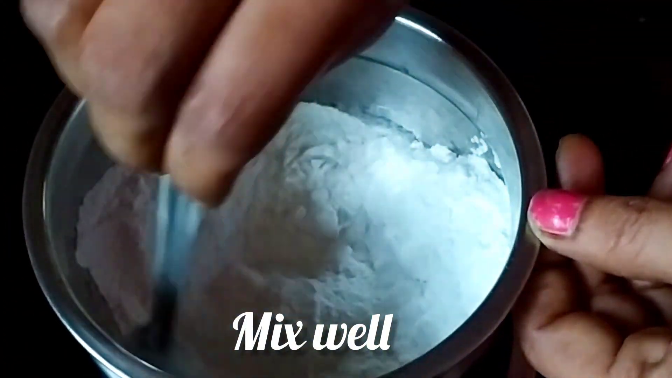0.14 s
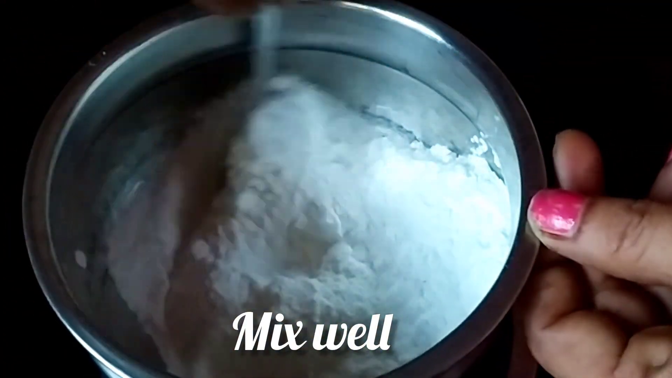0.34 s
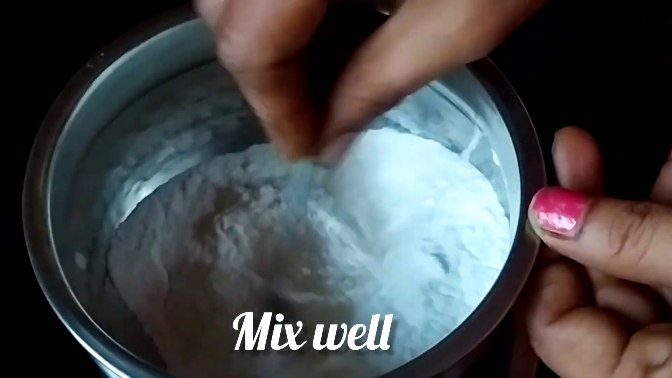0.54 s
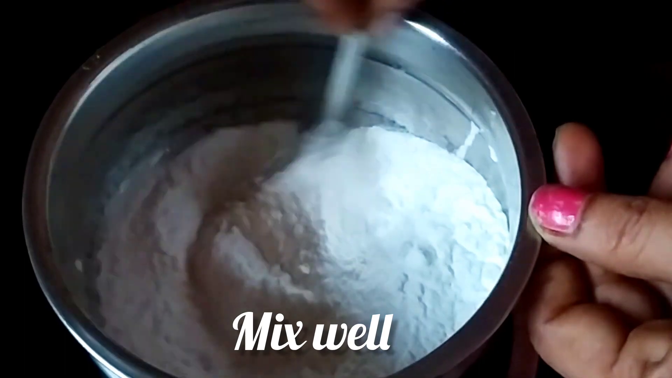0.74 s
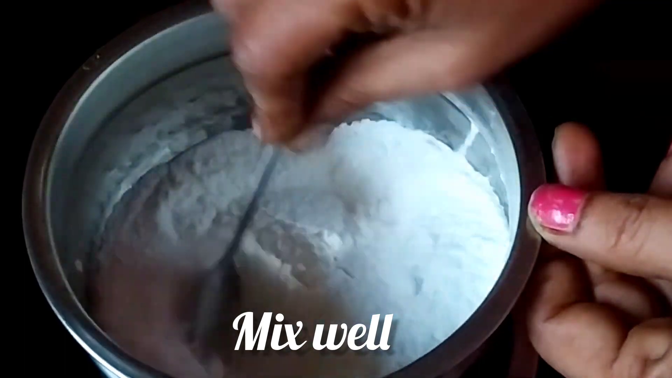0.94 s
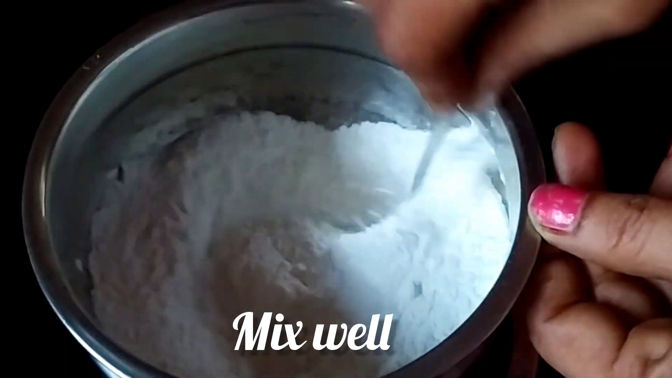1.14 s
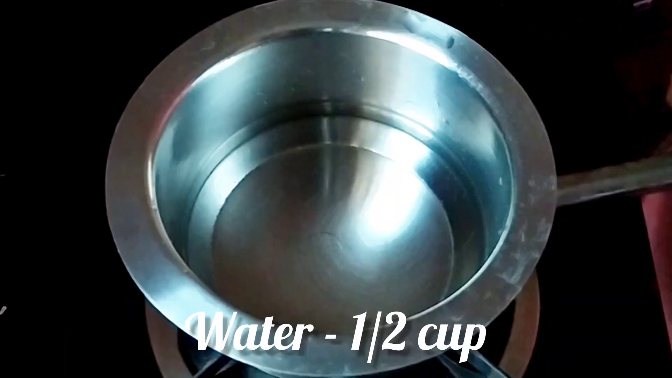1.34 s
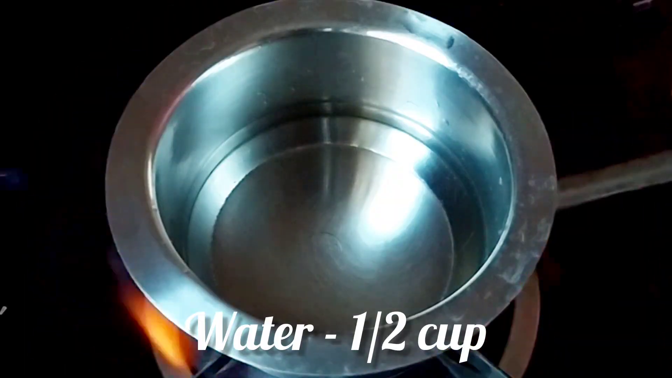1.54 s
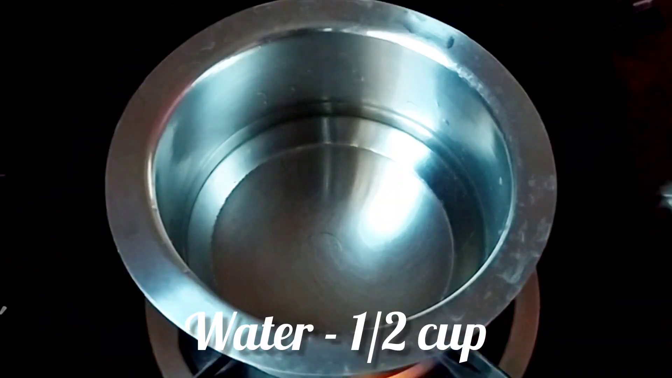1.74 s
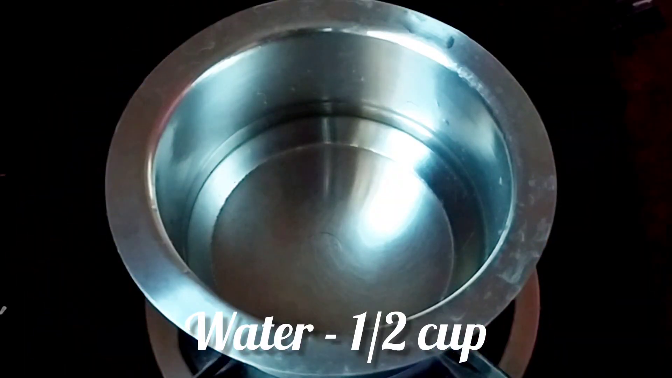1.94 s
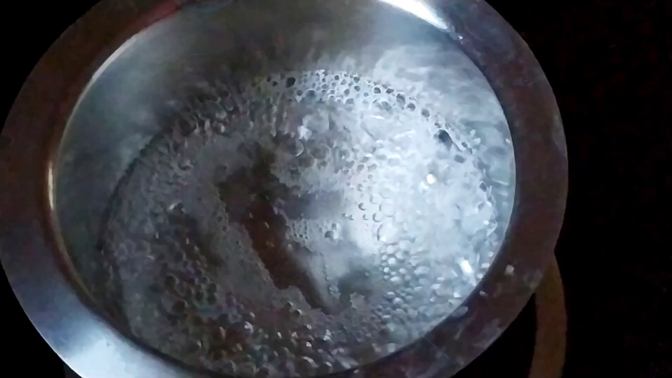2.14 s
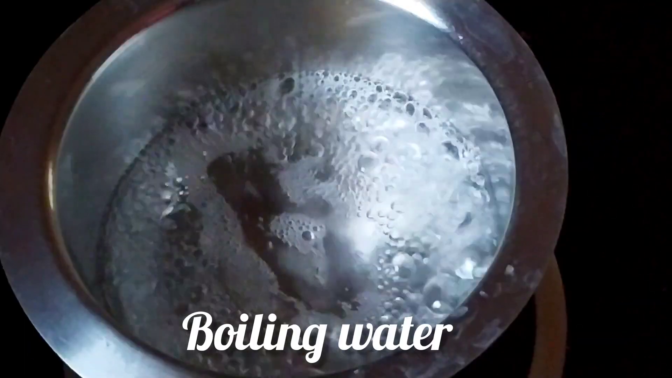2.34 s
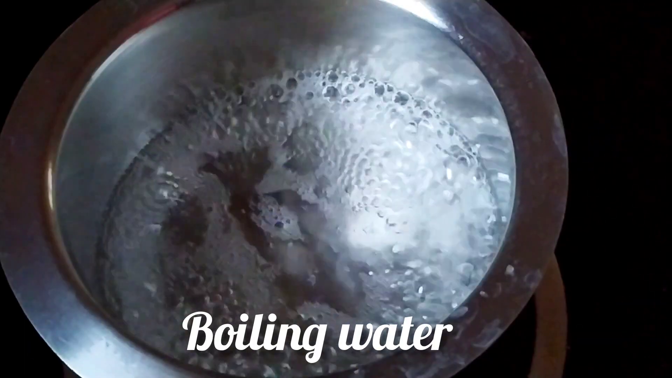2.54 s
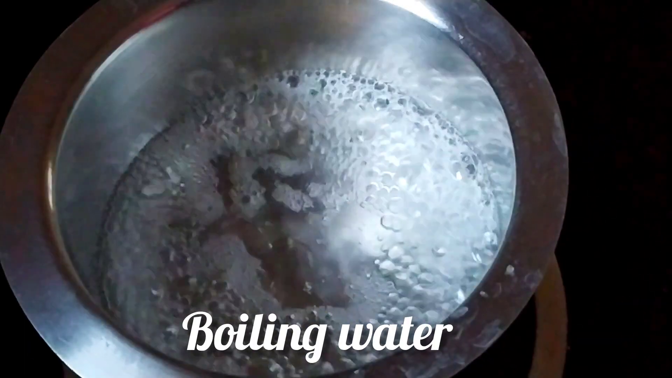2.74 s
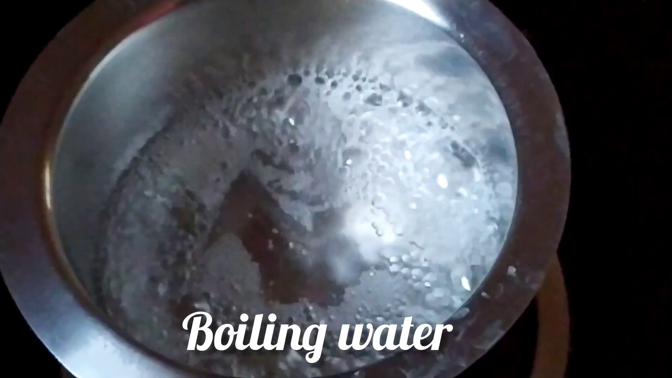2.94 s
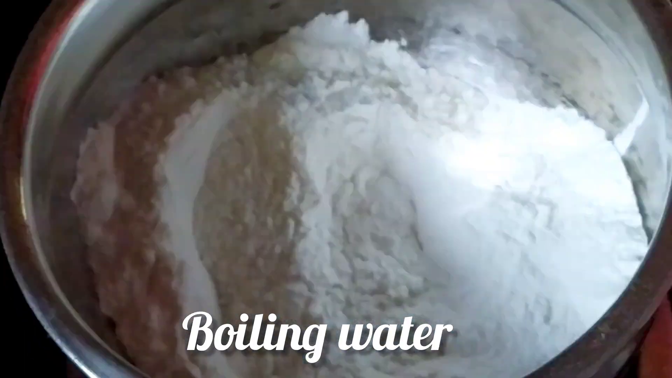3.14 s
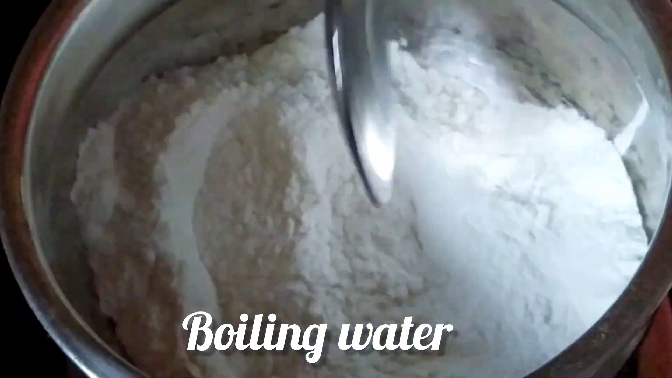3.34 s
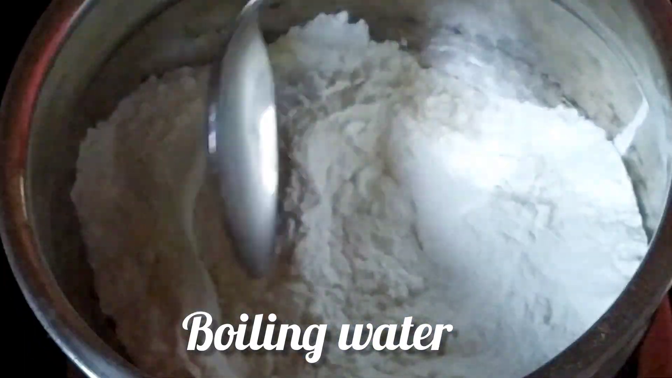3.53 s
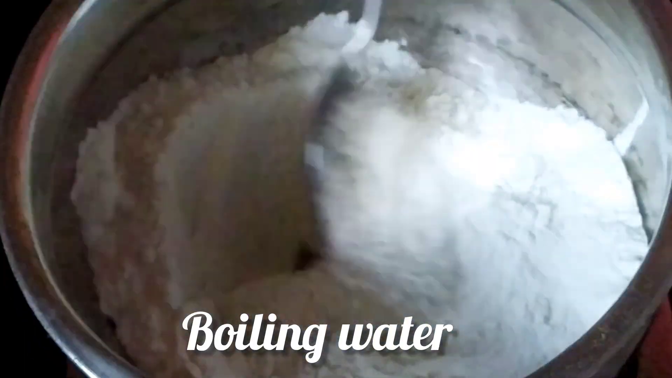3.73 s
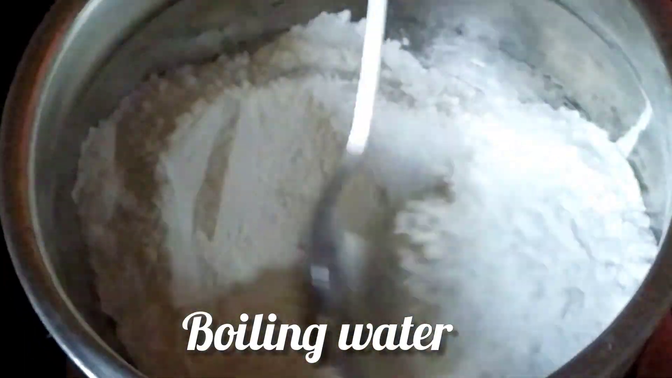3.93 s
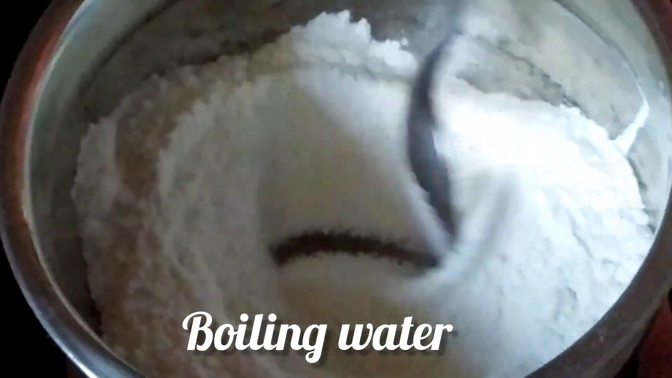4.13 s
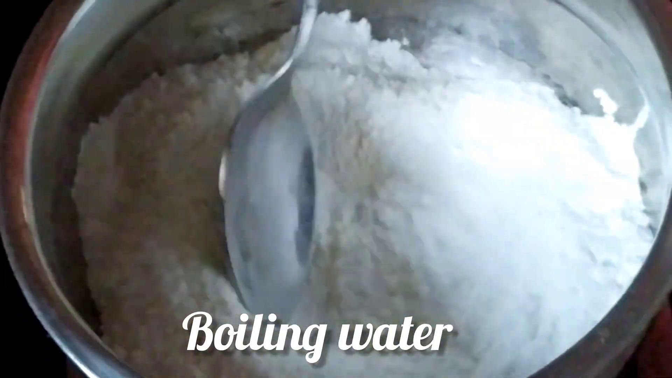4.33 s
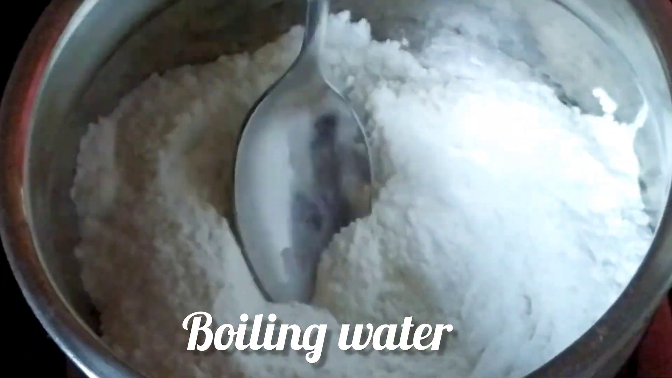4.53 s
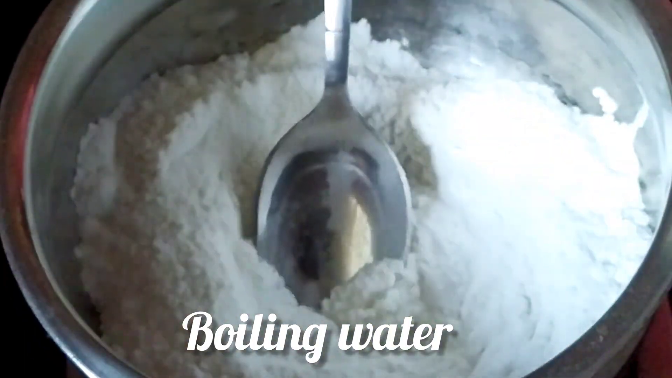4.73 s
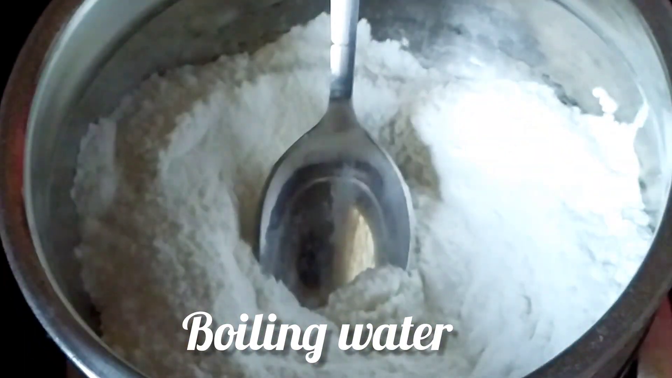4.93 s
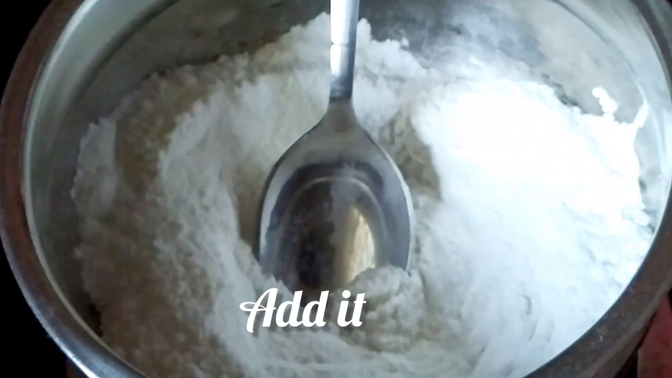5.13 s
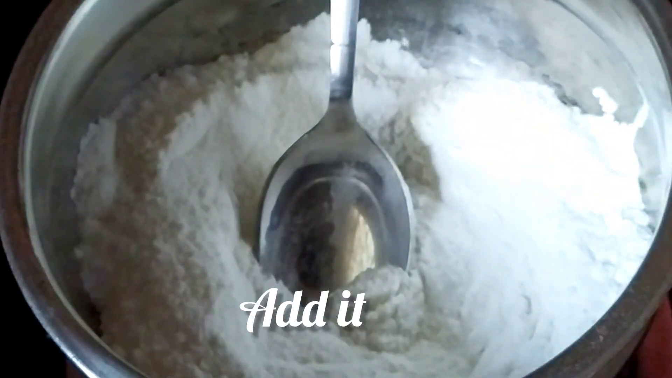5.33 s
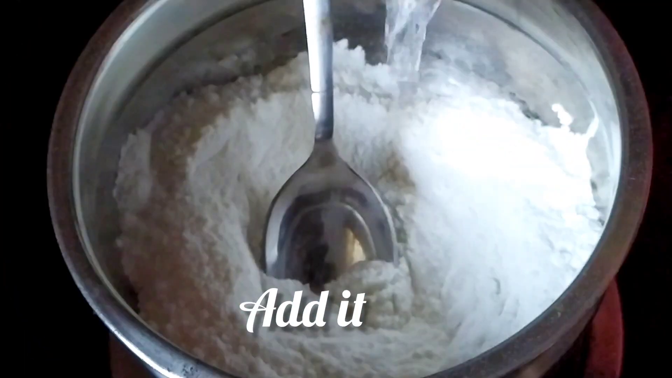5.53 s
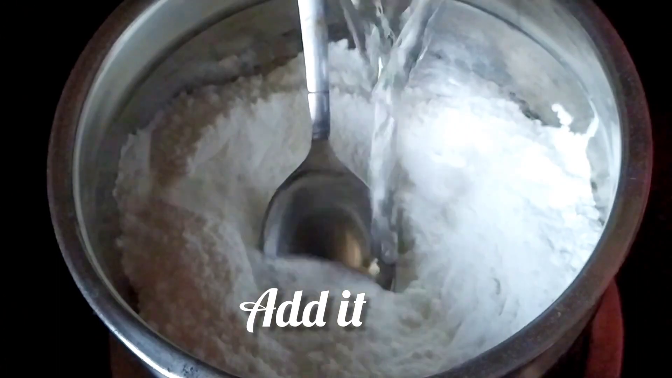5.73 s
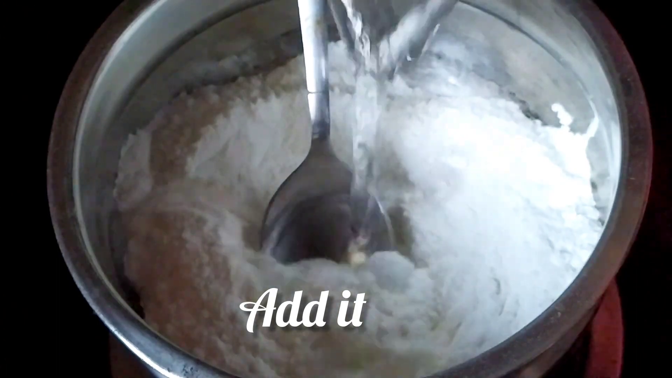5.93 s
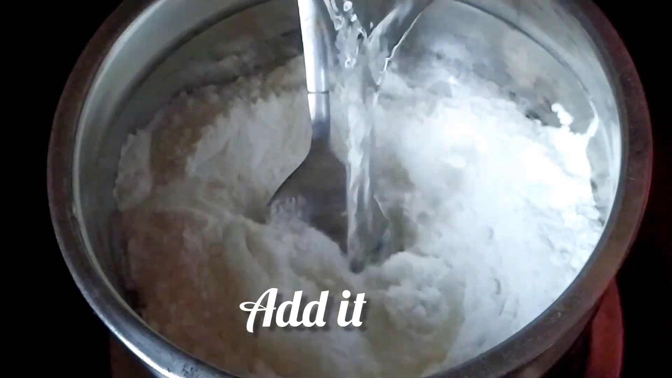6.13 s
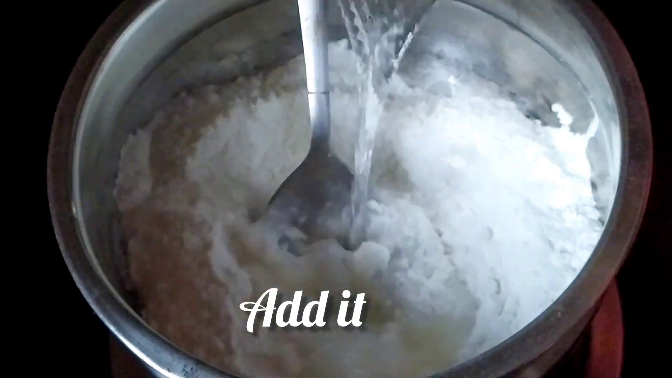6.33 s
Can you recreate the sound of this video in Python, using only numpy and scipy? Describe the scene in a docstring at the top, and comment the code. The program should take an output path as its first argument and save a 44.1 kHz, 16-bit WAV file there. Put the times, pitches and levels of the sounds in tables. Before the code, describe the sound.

Close kitchen sounds over a faint fan hum and hiss: first come short, gritty spoon strokes through flour in a steel bowl. The sharp snap of a spark lighter sets a gas burner fluttering, followed by more metallic clicks. The sound cuts out, a pot bubbles quietly for a moment, and it cuts out again. Dull spoon knocks lead to fading clinks against the bowl, and hot water pours in with a soft fizz.

```python
"""Stirring flour, boiling water.

A steel spoon grinds and knocks through flour in a steel bowl. A spark lighter snaps, a gas ring
catches and bubbles burst in a pot. The spoon digs again, clinks to rest on the bowl's wall, and hot
water fizzes in. A fan hum and a thin hiss run underneath; two near-silent gaps set off the boiling."""
import sys
import numpy as np
from scipy import signal
from scipy.fft import rfft, irfft
from scipy.io import wavfile
from scipy.ndimage import map_coordinates

SR = 44100
rng = np.random.default_rng(int(sys.argv[2]) if len(sys.argv) > 2 else 0)


def master_out(mix):
    """Clip the mix to full scale and print it as 16-bit PCM to the path in sys.argv[1]."""
    frames = np.transpose(np.atleast_2d(mix))
    ceiling = np.clip(frames, -1, 1)
    pcm = np.round(ceiling * 32767).astype(np.int16)
    wavfile.write(sys.argv[1], SR, pcm)


N = 280917
T = np.arange(N) / SR
AGE = T[:SR // 2]  # time since a blow, s

# audible spans (stirring and lighting, boiling, digging and pouring): start/s, end/s
SPANS = [(0, 2.199), (2.48, 3.041), (3.145, 6.4)]


def amp(db):
    """Decibels to gain."""
    return 10 ** (np.asarray(db) / 20)


def unit(x):
    """Scale to rms 1."""
    return x / np.sqrt(np.mean(x ** 2))


def pan(db):
    """Channel gains for a left-minus-right level."""
    return amp(np.array([[db], [-db]]) / 2)


def fade(t60_s):
    """Exponential decay of a blow."""
    return np.exp(-np.log(1000) * AGE / max(t60_s, .002))


def gate(start_s, end_s, edge_s=0.0022):
    """One between two times, with linear ramps."""
    return np.clip((T - start_s) / edge_s, 0, 1) * np.clip((end_s - T) / edge_s, 0, 1)


def add(out, s, x):
    """Mix a sound in at a time."""
    i = int(s * SR)
    out[:, i:i + x.shape[1]] += x[:, :N - i]


def walk(rate_hz):
    """Random drift with a spread near 1."""
    knots = rng.standard_normal(int(rate_hz * T[-1]) + 2)
    return np.interp(T * rate_hz, np.arange(len(knots)), knots)


def colour(x, spectrum, corner_hz=np.inf):
    """Shape by a spectrum and a low-pass; rms 1. Long waves reach both channels nearly alike."""
    f = np.fft.rfftfreq(x.shape[1], 1 / SR) + 1
    hz, db = np.transpose(sorted(spectrum))
    left, right = rfft(x)
    width = np.minimum(0.2 + (f / 850) ** 2, 1)
    mid, side = left + right, (left - right) * width
    gain = amp(np.interp(np.log(f), np.log(hz), db))
    gain /= np.sqrt((1 + (f / corner_hz) ** 4) * (1 + width ** 2))
    gain *= np.minimum(f / hz[0], 1) ** 2
    return unit(irfft(np.array([mid + side, mid - side]) * gain, x.shape[1]))


def noise(spectrum, size=N, corner_hz=np.inf):
    """Coloured stereo noise."""
    return colour(rng.standard_normal((2, size)), spectrum, corner_hz)


def grains(per_s, spread_db):
    """Random clicks of uneven size, slightly earlier on the right."""
    clicks = (rng.random(N) < per_s / SR) * rng.standard_normal(N)
    clicks *= amp(spread_db * np.minimum(rng.exponential(size=N), 4))
    return np.array([clicks, np.roll(clicks, -5)])


def wander(x, share, rate_hz):
    """Let all frequencies drift together."""
    position = np.cumsum(1 + share * walk(rate_hz))
    return np.array([map_coordinates(side, [position], mode="mirror") for side in x])


def reflect(x, wet_db, t60_s=1.0):
    """Direct sound plus dense reflections from vessel and tiled walls."""
    tail = rng.standard_normal((2, len(AGE))) * fade(t60_s)
    tail *= amp(wet_db) / np.sqrt(np.sum(tail ** 2) / 2)
    return (x + signal.fftconvolve(x, tail, axes=1)[:, :N]) / np.hypot(1, amp(wet_db))


def resonate(x, modes, width_hz):
    """Filter through modes broadened by touch, at unchanged level."""
    f = np.fft.rfftfreq(x.shape[1], 1 / SR)
    response = sum(amp(db) / np.square(1 + 2j * (f - hz) / width_hz) for hz, db in modes)
    return unit(irfft(rfft(x) * response, x.shape[1])) * np.std(x)


def ring(modes, t60_s, corner_hz=np.inf, uneven_db=3.5, loss_hz_s=np.inf):
    """Decaying modes, weighted anew by each contact; a soft one barely excites the high modes."""
    out = 0
    for hz, db in modes:
        phase = 2 * np.pi * rng.random() + min(hz / 2500, 1) * rng.standard_normal((2, 1))
        gain = amp(db + uneven_db * rng.standard_normal((2, 1))) / np.hypot(1, (hz / corner_hz) ** 4)
        beat = np.cos(2 * np.pi * (rng.random() * hz / 500) * AGE)  # close mode pairs
        out = out + gain * beat * np.sin(2 * np.pi * hz * AGE + phase) * fade(loss_hz_s / hz)
    return unit(out) * fade(t60_s) * (1 - fade(0.0038))


def blow(spectrum, contact_t60_s, tail_db, tail_t60_s, corner_hz=np.inf):
    """The crack of contact, then a wash of crowded modes and reflections."""
    decay = fade(contact_t60_s) + amp(tail_db) * fade(tail_t60_s)
    return noise(spectrum, len(AGE), corner_hz) * decay * (1 - fade(0.002))


def rattle(x, depth_db=2.8, rate_hz=300):
    """Loose steel makes and breaks contact, chopping a blow."""
    return x * unit(amp(depth_db * walk(rate_hz)))[:len(AGE)]


def fan(hum_hz=300.3):
    """A fan hums on one slightly wavering note."""
    phase = 2 * np.pi * np.cumsum(hum_hz + 0.67 * walk(14)) / SR
    return np.sin(phase) * amp(-62 + 0.99 * walk(8.2))


# room air and hiss spectra: f/Hz, level/dB
AIR = [(20, 12.5), (55, -4), (110, -5.5), (190, 2), (330, 0.5), (600, -7.5), (1200, -13), (5500, -20.5),
       (15000, -34)]
HISS = [(5780, -50), (6050, -7.5), (6400, 1), (6750, -7), (7250, 3), (7700, 0.5), (8600, -18.5), (9800, -7),
        (11600, -42)]


def room():
    """Soft air and a thin hiss, both weaker during the boiling."""
    boiling = gate(*SPANS[1])
    air = noise(AIR) * amp(-65.5 - 15 * boiling)
    hiss = noise(HISS) * amp(-57 - 8.2 * boiling) * pan(-3)
    return air + hiss


# flame spectrum, modes of the air round the pot: f/Hz, level/dB
FLAME = [(25, 1), (160, -16), (450, -19), (2200, -23.5), (5500, -36.5), (9500, -30.5), (15000, -52)]
POT_AIR_MODES = [(82, 1), (165.5, 2), (192, 3)]
# ignition puffs: t/s, level/dB
PUFFS = [(1.526, -34.5), (1.564, -31.5), (1.607, -37)]


def burner():
    """Gas catches with low puffs and a flare, then the flame flutters on."""
    lit_s = PUFFS[0][0]
    flare_db = 4 * np.exp(-np.abs(T - lit_s) / 0.24)
    out = noise(FLAME) * amp(-52.5 + flare_db + walk(26)) * gate(lit_s, SPANS[0][1], edge_s=0.023)
    for s, db in PUFFS:
        add(out, s, amp(db) * ring(POT_AIR_MODES, 0.26, uneven_db=0.5) * (1 - fade(0.035)))
    return out


# bubble spectrum: f/Hz, level/dB
BOIL = [(170, -4), (600, -5), (950, 3), (1400, -7), (2350, -6), (2780, 2), (3200, -10), (9800, -13),
        (14000, -36)]


def boil():
    """Small bubbles burst in the pot, with a few sharp ticks."""
    bubbles = colour(grains(per_s=2200, spread_db=2.2), BOIL)
    ticks = amp(-16) * colour(grains(per_s=70, spread_db=2), CRACK)
    return reflect(bubbles + ticks, wet_db=0) * amp(-63) * gate(*SPANS[1])


# fizz spectrum: f/Hz, level/dB
FIZZ = [(450, -12), (820, 0), (1100, -4), (3300, -9), (4950, -7), (5600, -13), (7500, -1), (10000, 1),
        (11500, -10), (15500, -20)]
# gushes: t/s, level/dB, rise/s
GUSHES = [(5.5, -52, 0.0015), (5.97, -59.5, 0.017)]


def pour(hold_s=0.057, fall_db_per_s=36):
    """Water slaps the dry bowl and fizzes over the hot rim into the flour in dwindling gushes."""
    flow = 0
    for s, db, rise_s in GUSHES:
        falling_s = np.maximum(T - s - rise_s - hold_s, 0)
        flow = flow + np.clip((T - s) / rise_s, 0, 1) * amp(db - fall_db_per_s * falling_s)
    flow *= amp(2 * walk(45))  # the stream wobbles
    fizz = colour(grains(per_s=1500, spread_db=2.6), FIZZ)
    out = reflect(fizz * flow, wet_db=10, t60_s=0.1)
    slap = resonate(noise(BOWL_BODY, len(AGE)), BOWL_MODES, width_hz=120) * fade(0.5)
    add(out, GUSHES[0][0], amp(-56) * slap)
    return out * pan(-1.2)


# plunger and steel impact spectra, tube and spring modes: f/Hz, level/dB
RASP = [(70, -14), (620, -10), (1000, -5), (2500, -7), (3000, -18), (10000, -21.5), (15000, -41)]
CRACK = [(200, -10), (500, -11), (1000, -6), (2600, -8), (5700, -8), (8800, -1.5), (11200, -3),
         (12200, -10.5), (16000, -15.5)]
TUBE_MODES = [(880, -3), (982, 2), (1090, 0), (1340, -7), (1632, -1), (2050, -3), (2190, -4), (2345, -3),
              (2600, -5), (2971, -3), (4963, -3), (8965, 1)]
SPRING_MODES = [(7300, -8), (8745, 0), (9400, -10), (15057, -17)]
# plunger squeezes, bumps on the stove: t/s, level/dB
SQUEEZES = [(1.381, -37), (1.475, -52), (1.652, -48.5)]
BUMPS = [(2.064, -36.5), (2.174, -34.5), (2.18, -38.5)]
# clicks (one hammer snap, then release and clatter): t/s, level/dB, tail/dB, tail t60/s, corner/Hz
LIGHTER_CLICKS = [(1.514, -14.5, -11, 0.36, 13800), (2.062, -20, -18, 1, 20000),
                  (2.162, -24, -12, 0.26, 11900), (2.1744, -20.5, -19, 0.15, 10030)]


def lighter(release_s=2.063, release_db=-36.5):
    """Plunger grind and one hammer snap; on release the spring sings, steel clatters and bumps the stove."""
    out = np.zeros((2, N))
    for s, db in SQUEEZES:
        rasp = rattle(blow(RASP, 0.14, -0.78, 0.63))
        grind = amp(-1) * rasp + amp(-3) * resonate(rasp, TUBE_MODES, width_hz=100)
        add(out, s, amp(db) * grind * pan(0.76))
    for s, db, tail_db, tail_t60_s, corner_hz in LIGHTER_CLICKS:
        crack = rattle(blow(CRACK, 0.012, tail_db, tail_t60_s, corner_hz))
        tube = amp(-12) * resonate(crack, TUBE_MODES, width_hz=60) + amp(-24) * ring(TUBE_MODES, 0.35)
        shimmer = amp(-19) * noise(GRIT, len(AGE)) * fade(0.34)
        add(out, s, amp(db) * (crack + tube + shimmer))
    buzz = rattle(resonate(blow(CRACK, .4, -6, .8), SPRING_MODES, width_hz=300))
    spring = amp(-3) * ring(SPRING_MODES, .9) + buzz
    add(out, release_s, amp(release_db) * spring)
    stove_spectrum = [(60, -46), (170, 6), (1000, 1.0), (3000, -0.5), (6000, -47.5)]
    for s, db in BUMPS:
        add(out, s, amp(db) * blow(stove_spectrum, 0.03, -2.5, 0.67))
    return out * gate(*SPANS[0])


# spectra of grit on steel and of the bowl's body: f/Hz, level/dB
GRIT = [(3100, -9.5), (4550, -1.5), (5700, -15), (7000, -4.5), (8400, 3.5), (9700, 5.5), (11500, -4),
        (12600, -3), (15500, -29.5)]
BOWL_BODY = [(480, -17.5), (790, 1), (1150, -9.5), (1550, -4), (2300, -13), (6000, -22)]
# strokes along the wall: t/s, length/s, grit/dB, body/dB
STROKES = [(0.166, 0.049, -46.5, -61), (0.269, 0.011, -57, -54), (0.349, 0.048, -35.5, -55.5),
           (0.404, 0.052, -46, -63.5), (0.639, 0.053, -62, -57), (0.684, 0.039, -42.5, -49.5),
           (0.808, 0.096, -47, -66), (1.027, 0.04, -40.5, -48.5), (1.125, 0.043, -50.5, -52.5),
           (1.192, 0.018, -51, -52), (1.354, 0.025, -47, -49), (4.076, 0.11, -57, -55.5),
           (4.616, 0.28, -54, -55), (5.113, 0.25, -64.5, -73)]


def stirring(edge_s=0.0078, light_edge_s=0.042, light_lead_s=0.014):
    """Flour catches and slips between spoon and wall: gritty treble over the bowl's body."""
    coarse, fine = 0, 0
    # flour rustles between strokes too
    body = amp(-65 + 2 * walk(4.4)) * gate(STROKES[0][0], SQUEEZES[0][0], edge_s=0.055)
    for s, length_s, grit_db, body_db in STROKES:
        light = np.clip((grit_db - body_db - 13) / 4, 0, 1)  # light strokes ease in, sound higher
        pressure = gate(s - light_lead_s * light, s + length_s + edge_s, edge_s + light_edge_s * light)
        coarse = coarse + amp(grit_db) * pressure * np.sqrt(1 - light)
        fine = fine + amp(grit_db) * pressure * np.sqrt(light)
        body = body + amp(body_db) * pressure
    slips = amp(5 * np.tanh(walk(170)))
    fine_spectrum = [(1.14 * hz, db) for hz, db in GRIT[2:]]
    clicks = grains(per_s=1800, spread_db=2.2)
    grit = slips * (coarse * colour(clicks, GRIT) + fine * colour(clicks, fine_spectrum))
    steel = resonate(grit, STEEL_MODES, width_hz=320)  # damped by hand and flour
    scrape = (amp(-1) * grit + amp(-6) * steel) * pan(-4)
    hollow = colour(grains(per_s=1500, spread_db=2), BOWL_BODY)
    hollow = wander(hollow, share=.06, rate_hz=12)  # resonances shift as the spoon travels
    return reflect(scrape + body * slips * hollow, wet_db=0, t60_s=0.25)


# edge snags: t/s, level/dB
SNAGS = [(.686, -38), (.7285, -34), (0.863, -45.5), (1.0305, -40.5), (1.3608, -36.5)]


def snags():
    """The spoon's edge snags on the wall and slips with a scratch."""
    out = np.zeros((2, N))
    for s, db in SNAGS:
        add(out, s, amp(db) * rattle(blow(GRIT, 0.018, -13, 0.14)))
    return out


def floor_boom(hz=163.3):
    """The bowl's floor booms at one slowly building note."""
    return ring([(hz, 0)], t60_s=0.62) * (1 - fade(0.22))


# thud spectrum, modes of the flour-laden bowl: f/Hz, level/dB
THUD = [(150, -32), (450, 0), (750, 1), (1300, -7), (3000, -10.5), (15000, -64)]
BOWL_MODES = [(480, -10), (700, -4), (805, 4), (885, -2), (1180, -4), (1432, -2), (1633, -9), (2370, -11)]
# knocks on the bowl's floor: t/s, level/dB, corner/Hz, boom/dB
KNOCKS = [(.794, -26, 2270, -31), (.864, -40, 1610, -18), (3.756, -48.5, 1770, -15.5),
          (3.875, -35.5, 1510, -25), (4.104, -37, 1530, -17), (4.26, -37, 1410, -15.5),
          (4.41, -41, 1320, -11), (4.476, -35.5, 1240, -25.5)]


def knocks(boom, soft_corner_hz=1465):
    """The spoon crunches through cushioning flour and thuds on the floor, ringing the bowl."""
    out = np.zeros((2, N))
    for s, db, corner_hz, boom_db in KNOCKS:
        pitch = (corner_hz / soft_corner_hz) ** 0.64  # firmer is shorter and higher
        spectrum = [(pitch * hz, level_db) for hz, level_db in THUD]
        thud = blow(spectrum, .035 / pitch ** 2, -10, .33, corner_hz)
        bowl = amp(-14.5) * resonate(thud, BOWL_MODES, width_hz=54)
        bowl += amp(-2.5) * ring(BOWL_MODES, 0.057, corner_hz)
        crunch = amp(-15) * noise(FIZZ, len(AGE), corner_hz=7970) * fade(0.22)
        sink = 1 - fade(.028 * (soft_corner_hz / corner_hz) ** 4)  # deep flour yields first
        knock = sink * (amp(-0.5) * thud + bowl + crunch) + amp(boom_db) * boom
        add(out, s, amp(db) * knock * pan(-1.4))
    return out


# modes of spoon and rim together: f/Hz, level/dB
STEEL_MODES = [(1690, -14), (3548, -4), (4671, 0), (4870, -14), (5175, -5), (5775, -3), (6085, -1),
               (6220, -3), (6480, -3), (6950, -7), (7397, 2), (7545, -3), (7955, 0), (8382, -5), (8865, 1),
               (9760, 2), (10090, -1), (10210, 0), (10620, -7), (10900, -5), (11520, -4), (12150, -12),
               (12600, -7), (13470, -8), (14300, -13)]
# bounces on the wall: t/s, level/dB
CLINKS = [(4.4745, -28.5), (4.6813, -33), (4.7605, -35.5), (4.792, -41), (4.83, -43), (4.856, -42)]


def clinks(boom, settle_db_per_bounce=2):
    """The spoon buzzes against bare steel and rings less with each bounce; high modes die first."""
    out = np.zeros((2, N))
    for bounce, (s, db) in enumerate(CLINKS):
        buzz = amp(-2) * resonate(rattle(blow(CRACK, .14, -10, .3)), STEEL_MODES, width_hz=120)
        spoon = amp(-16 - settle_db_per_bounce * bounce) * ring(STEEL_MODES, t60_s=0.9, loss_hz_s=2300)
        bowl = amp(-29) * ring(BOWL_MODES, t60_s=0.79)
        crack = amp(-8) * rattle(blow(CRACK, .04, -8, .3, corner_hz=3800))
        add(out, s, amp(db) * (crack + buzz + spoon + bowl) * pan(-0.83) + amp(-61.5) * boom)
    return out


def scene():
    """Sum of all sources, stereo."""
    scraping = stirring() + snags()
    boom = floor_boom()
    spoon = scraping + knocks(boom) + clinks(boom)
    return spoon + lighter() + burner() + boil() + pour() + fan() + room()


def record(dry, gap_db=-60, top_hz=16000):
    """Near silence between the spans, then a steep low-pass."""
    audible = sum(gate(start_s, end_s, edge_s=.001) for start_s, end_s in SPANS)
    lowpass = signal.ellip(8, .2, 80, top_hz, fs=SR, output="sos")
    return signal.sosfilt(lowpass, dry * np.maximum(audible, amp(gap_db)))


dry = scene()
out = record(dry)
master_out(out)
```